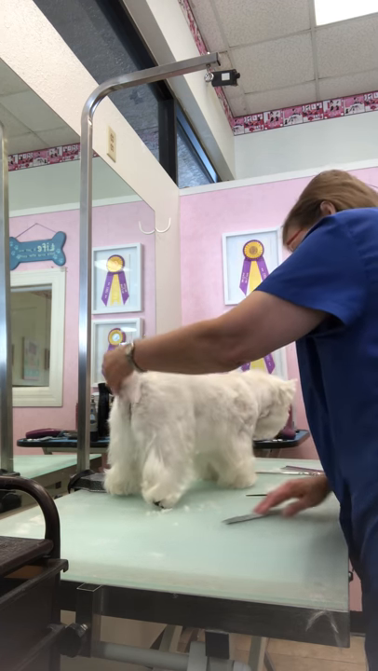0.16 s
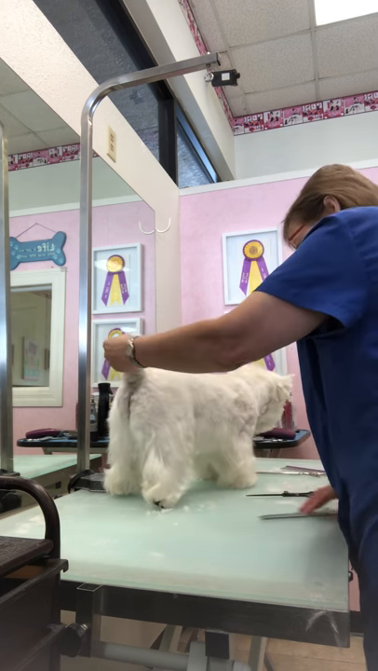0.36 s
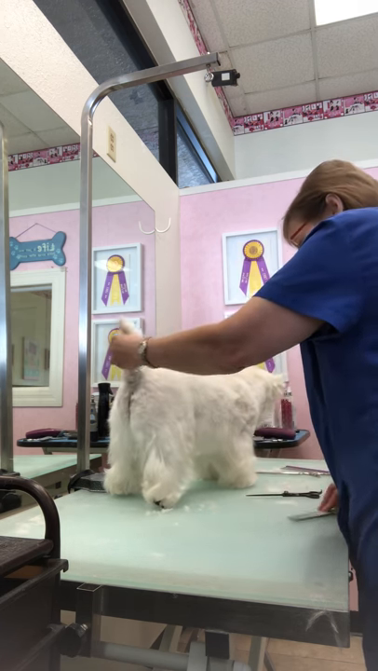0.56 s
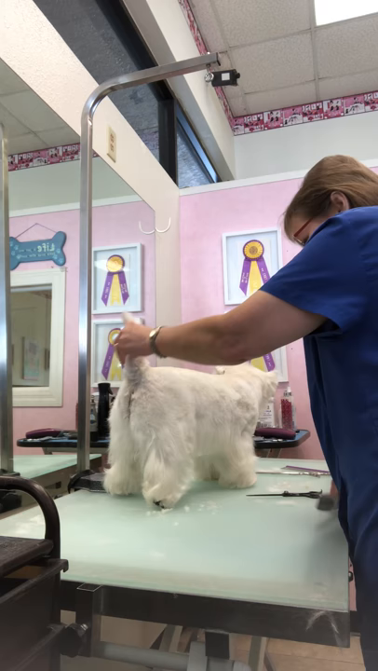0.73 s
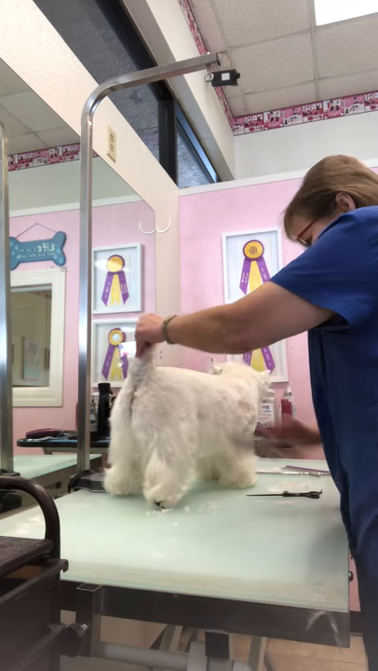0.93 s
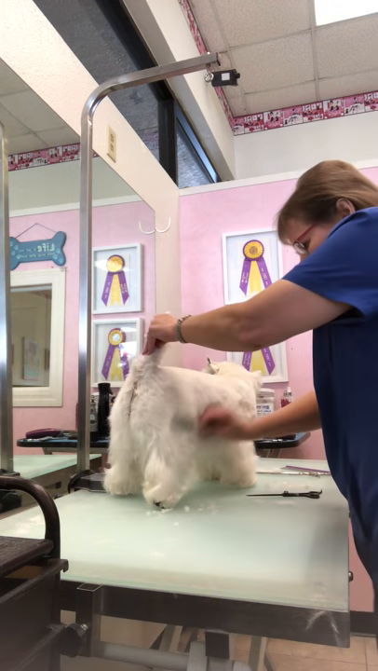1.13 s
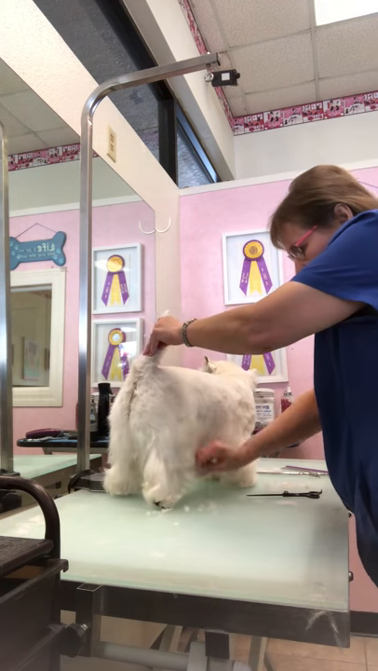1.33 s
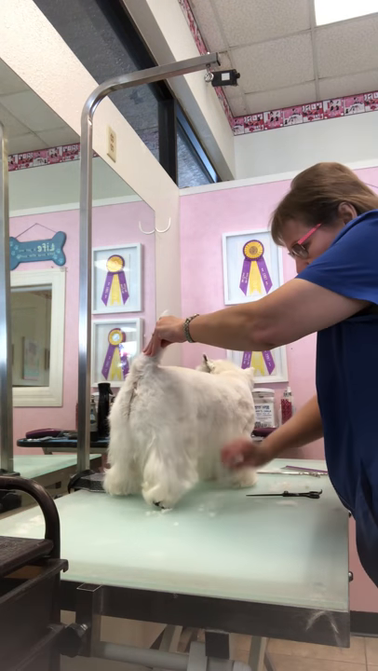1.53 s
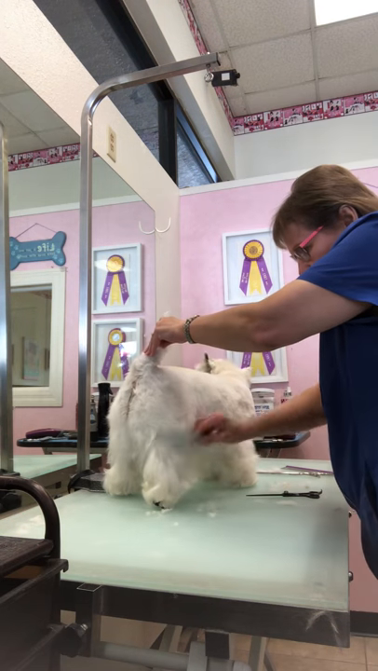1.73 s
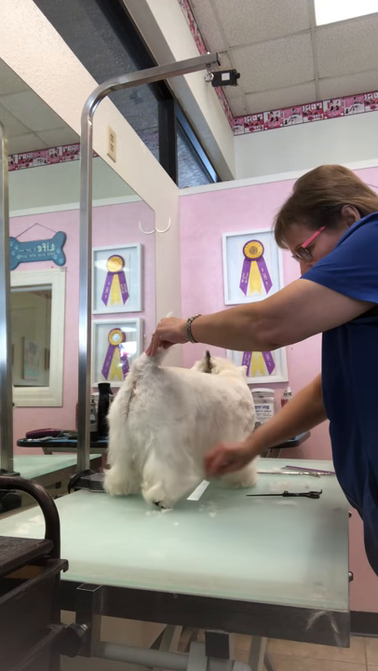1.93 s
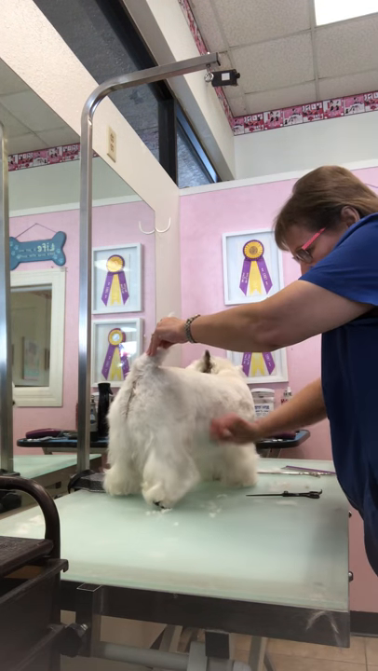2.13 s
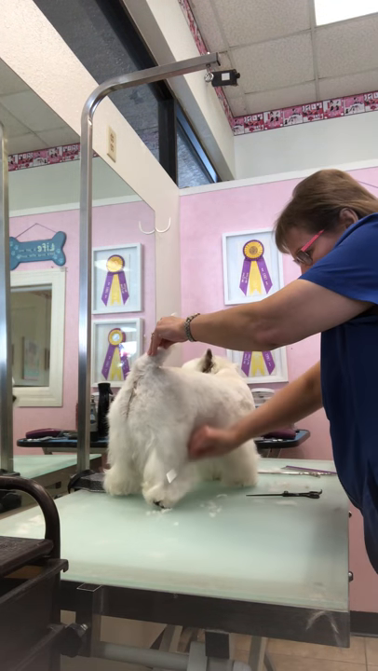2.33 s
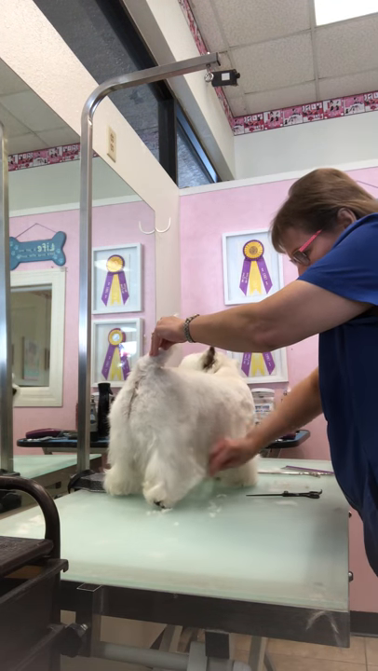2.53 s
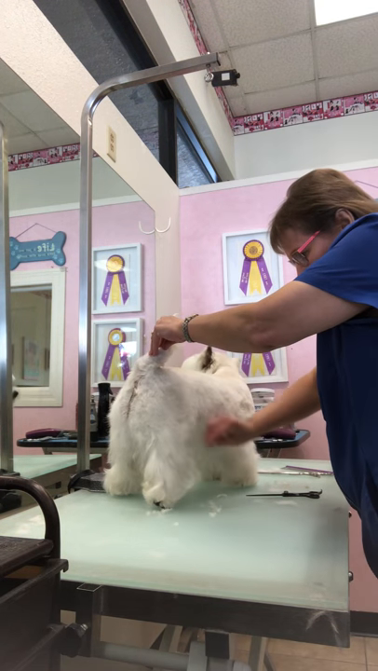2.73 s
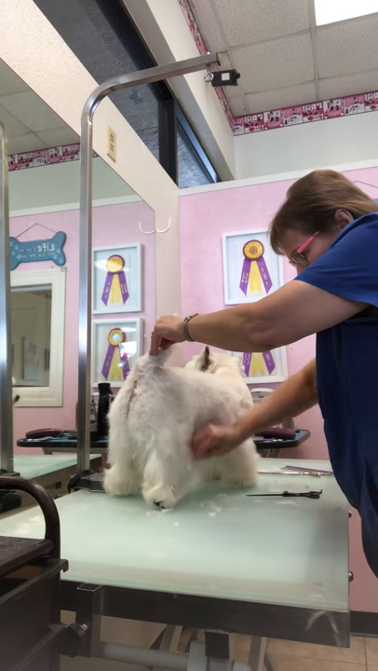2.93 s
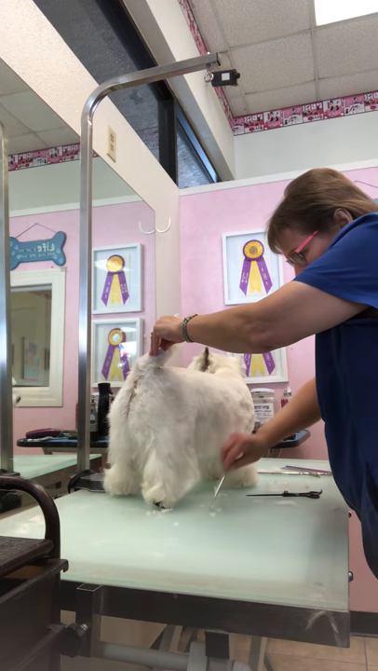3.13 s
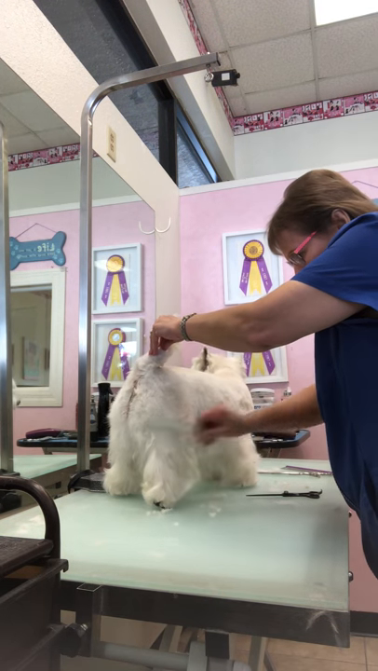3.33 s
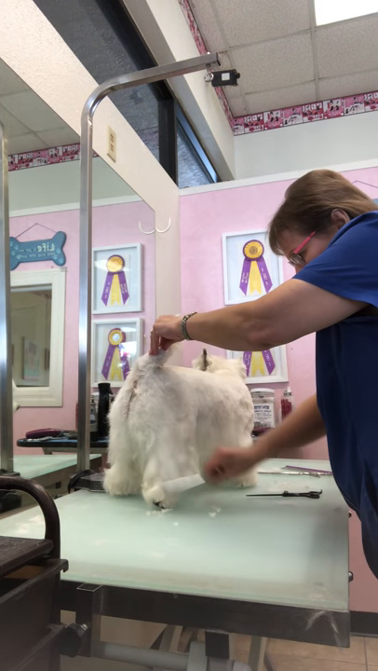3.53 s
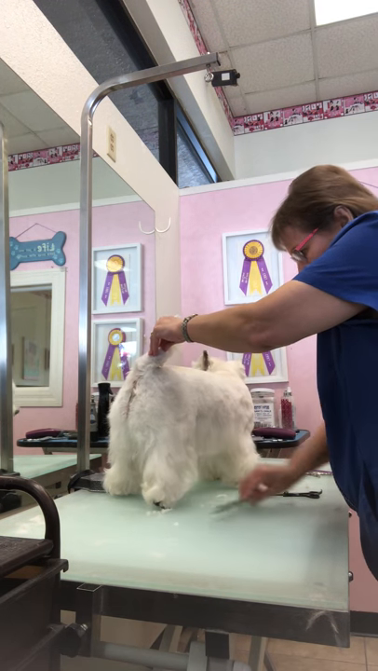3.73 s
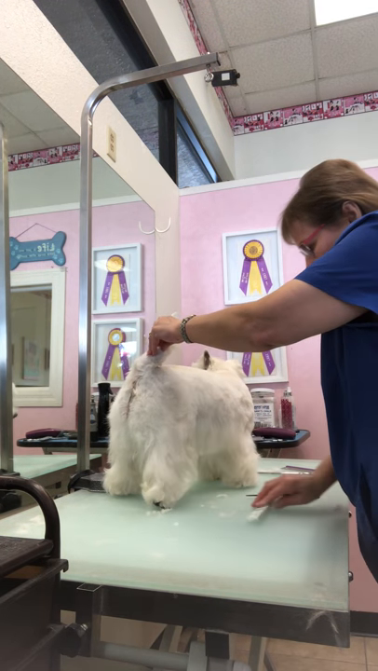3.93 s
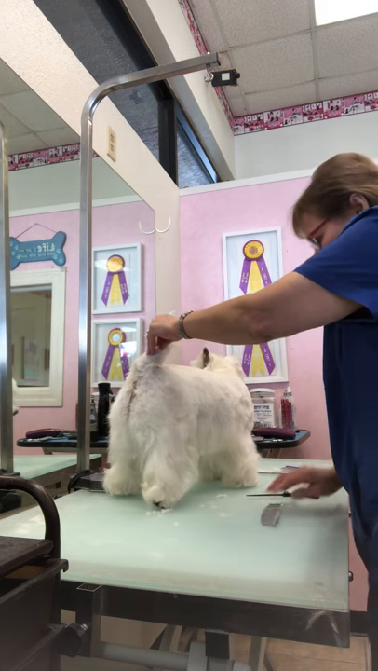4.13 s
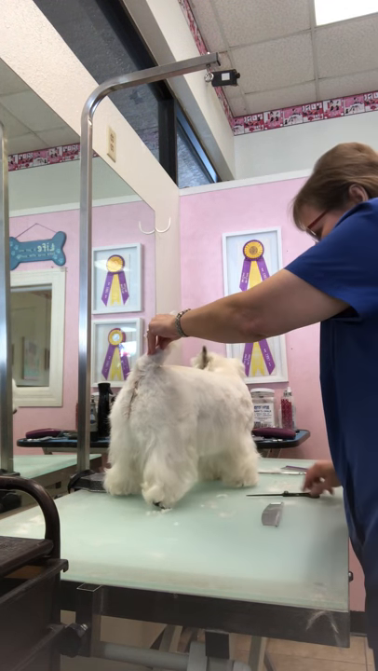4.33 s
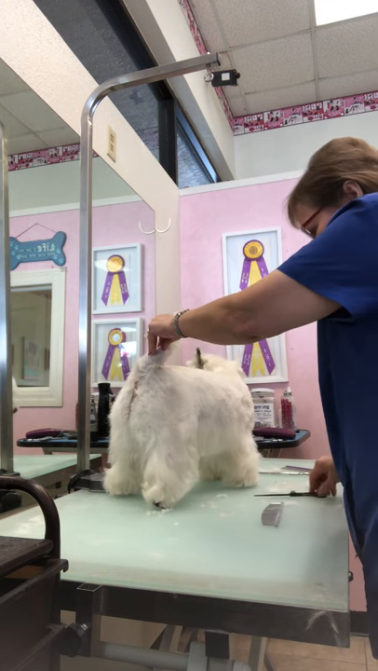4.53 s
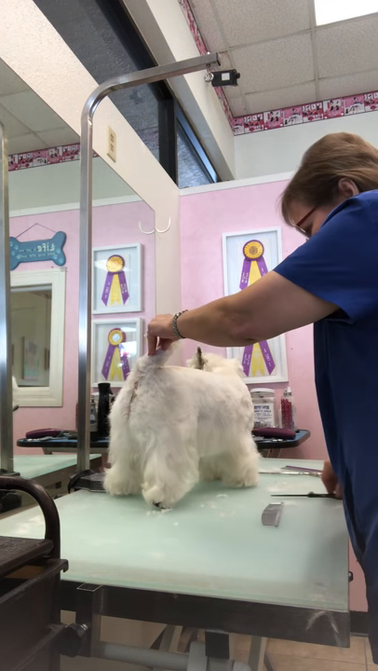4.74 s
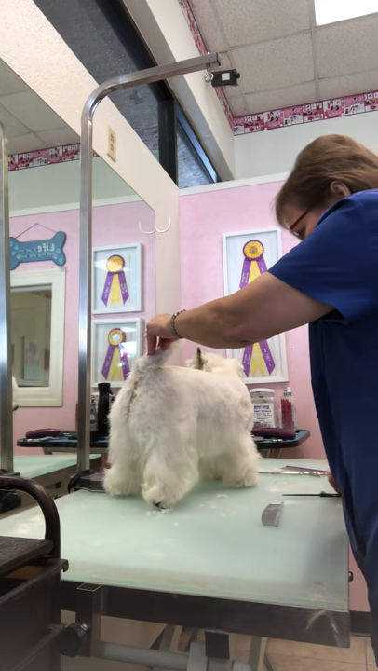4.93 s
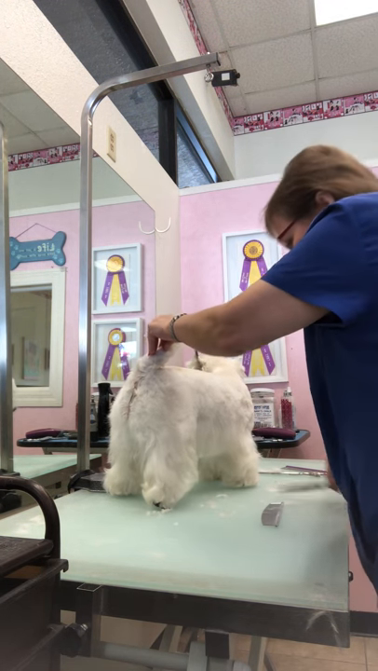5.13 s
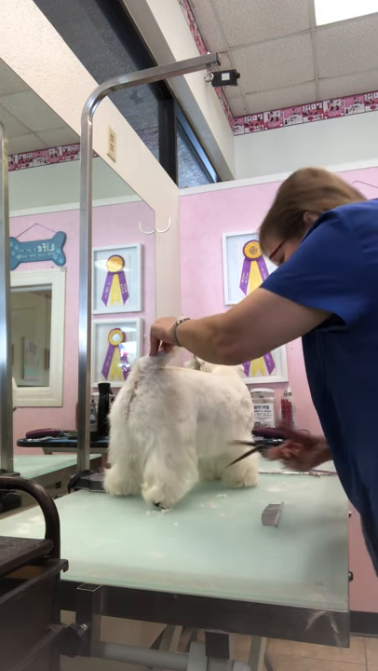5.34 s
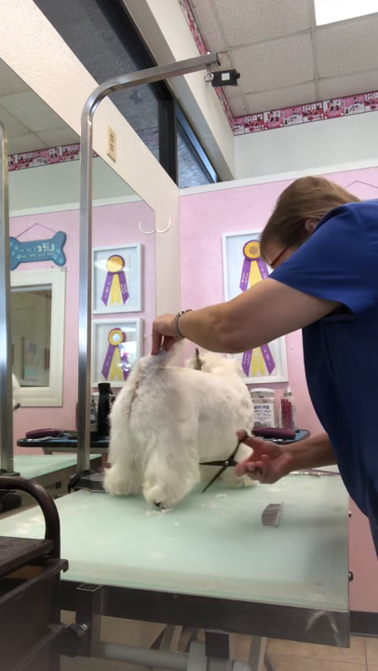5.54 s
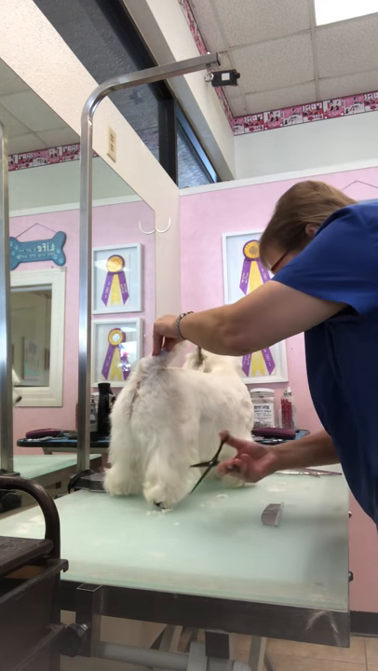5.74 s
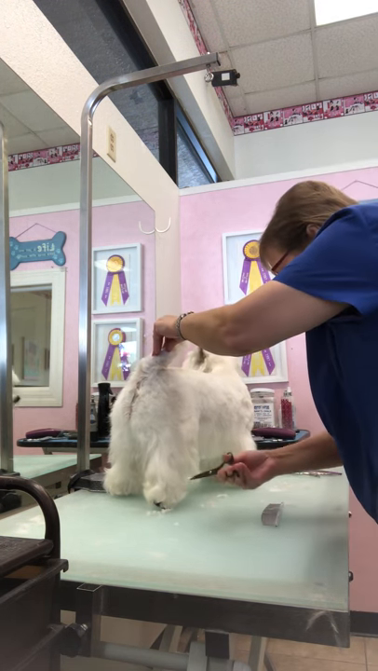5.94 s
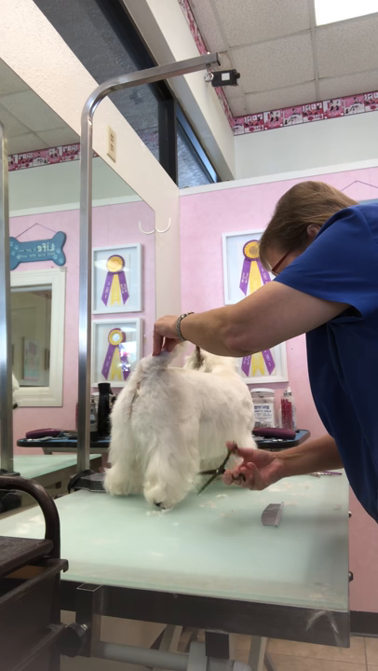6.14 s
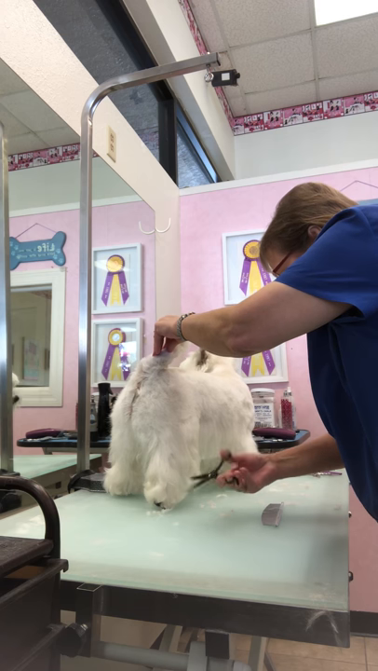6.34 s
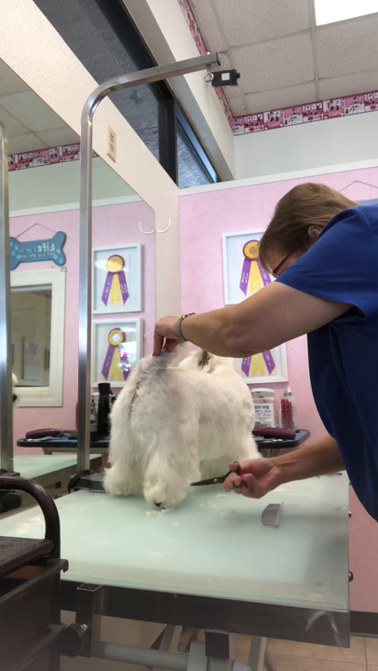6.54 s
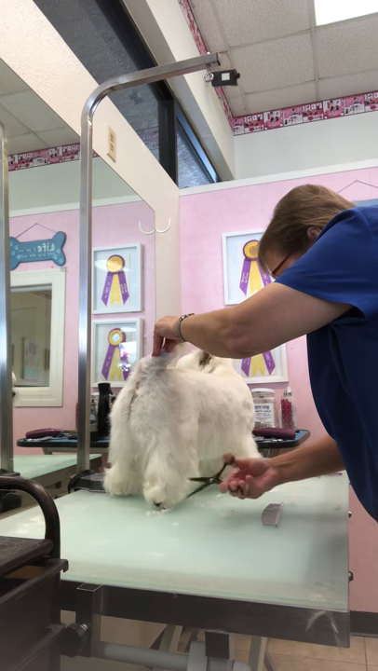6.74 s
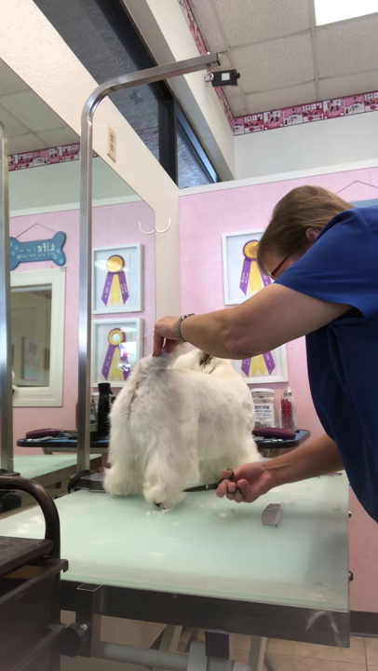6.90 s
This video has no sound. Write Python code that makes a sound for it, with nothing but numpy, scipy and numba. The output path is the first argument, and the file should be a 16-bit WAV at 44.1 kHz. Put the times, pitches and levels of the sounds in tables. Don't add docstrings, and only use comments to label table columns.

```python
import sys
import numpy as np
from scipy import signal
from scipy.fft import rfft, irfft, next_fast_len
from scipy.io import wavfile
from numba import njit

SR = 44100
rng = np.random.default_rng(int(sys.argv[2]) if len(sys.argv) > 2 else 0)


def generate_wav(sig):
    pcm = np.round(np.clip(np.atleast_2d(sig).T, -1, 1) * 32767).astype(np.int16)
    wavfile.write(sys.argv[1], SR, pcm)


def undo_db(level):
    steps = np.asarray(level, float) / 20
    return 10 ** steps


N = 311787

# (time [s], rise [s], fall [s], level [dB], loudest ring [Hz])
COMB_SLIDES = [
    (0.011, .03, .045, -58, 3000),
    (.09, 0.17, 0.51, -51.5, 2670),
    (.675, 0.041, 0.17, -60.5, 3330),
    (.764, 0.011, 0.062, -54, 3000),
    (3.655, 0.074, 0.24, -46.5, 2000),
]
# (frequency [Hz], density [dB per Hz])
COMB_HISS_SPECTRUM = [(290, -20), (500, 1), (933, -12), (1770, 0.5), (3200, -4.5), (3650, -5),
                      (5390, -17.5), (12100, -10.5), (16000, -15.5)]
# (frequency [Hz], width [Hz], level [dB])
COMB_MODES = [(2300, 180, -20), (3070, 130, 7), (5040, 73, 0.5), (7900, 130, -2), (11900, 150, -2),
              (14100, 150, -3)]
# (time [s], rise [s], body level [dB], relative hair hiss [dB], ringing teeth [Hz])
COAT_STROKES = [
    (1.494, 0.0021, -52, -4, 2600),
    (1.98, 0.045, -56.5, 11, 4200),
    (2.595, .05, -58, 6.5, 4200),
    (3.072, 0.075, -58, 8, 6100),
]
# (frequency [Hz], density [dB per Hz])
COAT_SPECTRUM = [(410, -28), (700, 4), (1600, -6), (2880, -4.5), (4720, -7), (6370, -1), (8700, -12),
                 (12000, -12.5), (14500, -5), (16000, -3)]
# (time [s], rise [s], fall [s], level [dB], loudest ring [Hz])
SHEARS_DRAGS = [
    (4.412, 0.038, 0.022, -46.5, 1520),
    (4.456, 0.0066, 0.18, -42, 1230),
    (4.668, 0.063, 0.29, -43, 1300),
    (4.91, 0.15, 0.18, -43, 1350),
    (5.108, .004, 0.2, -43.5, 2100),
]
# (frequency [Hz], density [dB per Hz])
DRAG_SPECTRUM = [(290, -33), (500, -4.5), (575, -51), (990, 18), (1290, -19), (1420, -7), (2350, 2.5),
                 (14000, -35)]
# (frequency [Hz], width [Hz], level [dB])
SHEARS_MODES = [(1098, 72, -3), (1460, 33, 11.5), (1688, 15, 14.5), (2025, 160, 6), (2540, 150, -7.5),
                (3220, 210, -37), (3900, 33, -10), (4470, 23, -10)]
# (shut time [s], shut level [dB], run-up level [dB], whisper [Hz], run-up top before shut [s])
BLADE_SNIPS = [
    (6.044, -51, -61, 12750, 0.035),
    (6.511, -50, -58.5, 14040, .027),
    (6.946, -52.5, -58, 14100, .024),
]
# (time [s], rise [s], fall [s], level [dB], whisper [Hz])
BLADE_OPENINGS = [
    (5.341, .006, .07, -52.5, 12200),
    (6.198, 0.01, 0.039, -59, 11300),
    (6.668, 0.0055, .05, -56.5, 11500),
]
# (frequency [Hz], density [dB per Hz])
EDGE_SPECTRUM = [(880, -19), (1500, 5), (2060, -36), (3060, 3), (3920, -31), (6060, 4), (8570, -9),
                 (9370, -15), (11500, -13), (12500, -4), (16000, 3)]
# (frequency [Hz], width [Hz], level [dB])
BLADE_MODES = [(3180, 350, -7), (5400, 480, 6), (10600, 250, 4), (12300, 370, 7), (13700, 400, -5)]
# (time [s], length [s], level [dB], pitch [Hz])
SINGING_EDGES = [(0.024, 0.061, -62.5, 3650), (0.091, 0.5, -58, 3600), (0.53, 0.16, -66, 3080),
                 (.2, 0.31, -60.5, 2200), (.2, .25, -68, 5150), (.22, 0.28, -61.5, 12400),
                 (0.41, 0.091, -64, 10500), (.67, 0.087, -58, 3200), (0.65, 0.15, -64, 10200),
                 (.76, 0.027, -59, 7230), (0.4, 0.067, -57, 784), (1.497, 0.14, -62.5, 2610),
                 (1.497, 0.09, -80, 5400), (2.005, 0.045, -53.5, 2700), (1.994, 0.12, -65, 4220),
                 (3.659, 0.024, -43.5, 770), (3.72, 0.079, -52.5, 7130), (3.753, 0.047, -46, 1870),
                 (3.803, 0.12, -53.5, 3670), (3.862, 0.14, -65.5, 4270), (5.1, 0.035, -65, 7700)]
# (time [s], length [s], level [dB], centre [Hz])
BROAD_RUSTLES = [(1.87, 0.039, -65, 1430), (2.13, .07, -66, 1400), (2.41, 0.07, -65.5, 1530),
                 (2.97, .09, -62.5, 1440), (3.0, 0.044, -72, 3000), (3.114, 0.078, -72, 6700),
                 (2.0, 0.055, -58, 13200), (.01, 0.055, -59, 950), (.1, .12, -57, 1240),
                 (4.915, .1, -61, 4600), (4.69, .06, -63, 4000), (6.005, .03, -68, 3100),
                 (6.48, .015, -65, 2600), (6.925, .03, -66, 2900), (4.025, .024, -60, 2300),
                 (4.449, 0.011, -69, 6000), (4.785, 0.024, -61, 5000), (5.42, 0.24, -72.5, 2800),
                 (5.45, 0.22, -70, 1540), (5.42, 0.23, -73, 5000), (5.345, 0.033, -61.5, 6600),
                 (6.2, 0.04, -72, 5550), (6.67, 0.026, -70, 5300)]
# (time [s], peak level [dB], clack pitch [Hz], thud level [dB], tick level [dB])
TABLE_BLOWS = [(0.7662, -44.5, 3500, -74, -72), (1.495, -36, 2730, -37, -59),
               (1.9853, -44, 1850, -42.5, -57), (2.6013, -45.5, 1550, -53.5, -58),
               (3.078, -43.5, 1590, -46, -67), (3.6521, -34.5, 1010, -33.5, -39),
               (4.0461, -9, 1880, -35, -33.5), (4.4603, -56, 980, -71, -77), (4.6749, -48, 1450, -57, -84),
               (4.7517, -54, 1870, -54, -77), (4.7891, -58, 1330, -48.5, -73),
               (5.0372, -35, 1460, -60, -62), (5.1108, -30, 2000, -47, -49.5)]
# (frequency [Hz], level [dB], decay T60 [s])
TABLE_MODES = [(135, 1.5, .12), (190, -1.5, 0.046), (248.4, -6.5, 0.35), (312.4, -1.5, 0.063),
               (360, -4.5, 0.041), (450, -1.5, 0.18), (514.4, -8, 0.048), (690, -2.5, 0.12)]
# (time [s], peak level [dB], pitch [Hz], decay T60 [s])
SOFT_BUMPS = [(1.502, -44.5, 287, 0.34), (1.55, -47, 423, 0.13), (3.084, -47, 260, 0.18),
              (3.66, -42.5, 510, 0.22), (2.17, -56.5, 800, 0.086), (3.408, -59.5, 687, 0.13),
              (3.422, -40.5, 163, 0.35), (3.518, -45, 273, 0.14), (4.05, -37, 489, 0.26),
              (5.129, -45, 450, 0.16), (6.299, -61.5, 1380, 0.093), (6.519, -59, 1440, 0.11)]
# (time [s], peak level [dB], pitch [Hz])
TIP_TICKS = [
    (5.343, -41, 12540),
    (6.0433, -48, 10600),
    (6.2013, -49, 10430),
    (6.51, -37, 13700),
    (6.671, -45, 11180),
    (6.8194, -72, 11230),
    (6.944, -39, 14400),
]
# (frequency [Hz], T60 [s])
ROOM_DECAY = [(200, 0.88), (1000, 0.9), (2000, 0.45), (5000, 0.54), (10000, 0.36), (16000, 0.26)]
# (slip [Hz], level [dB], time in step [s])
NEIGHBOUR_MOTORS = [(-.44, -56.5, 3.4), (.72, -67, 2.94)]
# (multiple [1], level [dB])
MOTOR_OVERTONES = [(2, -57), (3, -60.5), (4, -66), (5, -66.5)]
# (frequency [Hz], density [dB per Hz])
AIR_SPECTRUM = [(18, -30), (30, -16), (59, -5.5), (131, -1), (194, -8.5), (287, -7), (364, -9.5),
                (486, -11.5), (801, -22.5), (1720, -32), (2480, -33), (7470, -41), (8740, -46),
                (14800, -46.5), (16000, -54)]
# (time [s], level [dB])
DUCT_GUSTS = [
    (0.0, 5.8),
    (3.55, 1.8),
]

SLIDE_RULE = dict(start_db=-11.5, end_db=-17.5, bright_db=0, follow=0.29, start_ratio=0.95, end_ratio=1.6)
STROKE_RULE = dict(start_db=-5.5, end_db=-22.5, follow=0.58, start_ratio=1, end_ratio=0.23)
DRAG_RULE = dict(start_db=-10, end_db=-33.5, bright_db=-17.5, follow=-0.62, start_ratio=1.22, end_ratio=0.91)
OPENING_RULE = dict(start_db=-1, end_db=-30, bright_db=-10, follow=-0.31, start_ratio=1, end_ratio=1.2)


def comb_slides():
    pushes = [push(*row, **SLIDE_RULE) for row in COMB_SLIDES]
    return friction(pushes, COMB_HISS_SPECTRUM, COMB_MODES, 4100, per_s=9000, spread_db=-1, modes_db=-7,
                    flicker_db=0.5, glide_db=-15, glide_width_hz=500, teeth_db=1)


def coat_strokes():
    pushes = [push(s, rise, 0.1, db, hz, bright_db=hiss_db, **STROKE_RULE)
              for s, rise, db, hiss_db, hz in COAT_STROKES]
    return friction(pushes, COAT_SPECTRUM, [], 3850, per_s=9800, spread_db=1, modes_db=-5,
                    flicker_db=1.5, glide_db=-9, glide_width_hz=1600, teeth_db=0)


def shears_drags():
    pushes = [push(*row, **DRAG_RULE) for row in SHEARS_DRAGS]
    return friction(pushes, DRAG_SPECTRUM, SHEARS_MODES, 3050, per_s=4000, spread_db=0.5, modes_db=3.5,
                    flicker_db=-1.5, glide_db=5.5, glide_width_hz=320, teeth_db=-14.5)


def blade_strokes():
    moves = [snip(*row) for row in BLADE_SNIPS] + [push(*row, **OPENING_RULE) for row in BLADE_OPENINGS]
    return friction(moves, EDGE_SPECTRUM, BLADE_MODES, 9900, per_s=7000, spread_db=2.5, modes_db=-8,
                    flicker_db=-1.5, glide_db=-4, glide_width_hz=1400, teeth_db=-8.5, bright_first=True)


def push(s, rise, fall, db, hz, start_db, end_db, bright_db, follow, start_ratio, end_ratio):
    return [(s, db + start_db, bright_db + follow * start_db, hz * start_ratio),
            (s + rise, db, bright_db, hz),
            (s + rise + fall, db + end_db, bright_db + follow * end_db, hz * end_ratio)]


def snip(s, db, run_db, whisper_hz, lead):
    start_hz, open_hz = whisper_hz * 0.78, whisper_hz * 0.85
    ring_hz, shut_hz = 3000, 3000 * 1.33
    hair_start_db, hair_run_db, hair_shut_db, hair_after_db = -12, 1, -6.5, 2
    return [(s - lead - 0.035, run_db - 25, hair_start_db, start_hz, ring_hz),
            (s - lead, run_db, hair_start_db, open_hz, ring_hz),
            (s - lead * 0.7, run_db - 2.5, hair_run_db, whisper_hz, ring_hz),
            (s - 0.011, run_db - 14, hair_run_db, whisper_hz, ring_hz),
            (s, db, hair_shut_db, whisper_hz, shut_hz),
            (s + 0.019, db - 28, hair_after_db, whisper_hz, shut_hz),
            (s + 0.06, db - 38, hair_after_db, whisper_hz, ring_hz)]


def friction(strokes, spectrum, modes, split_hz, per_s, spread_db, modes_db, flicker_db, glide_db,
             glide_width_hz, teeth_db, bright_first=False):
    out = np.zeros(N)
    for rows in strokes:
        start, end = rows[0][0], rows[-1][0]
        size = SR // 4 * (1 + int((end - start + 0.06) * 4))
        t = start + np.arange(size) / SR
        first_db, second_db, *glides = in_time(rows, t)
        jerks = slips(size, per_s, spread_db, flicker_db)
        sound = coloured(jerks, spectrum)
        for hz in glides:
            turn = 2 * np.pi * np.clip(hz, 100, 0.45 * SR) / SR
            glide = gliding(jerks, turn, np.exp(-np.pi * glide_width_hz / SR))
            sound = sound + undo_db(glide_db) * rms_one(glide)
        caught = [(hz, width, db + at_hz(spectrum, hz) + teeth_db) for hz, width, db in teeth()]
        rung = np.zeros(size)
        for hz, width, db in modes + caught:
            swell = undo_db(db + 4.2 * drift(3.2, size))
            rung += swell * rms_one(ring(jerks, hz, 1.8 / width)) * np.sqrt(width)
        sound = sound + undo_db(modes_db) * rms_one(rung)
        dull = signal.sosfilt(signal.butter(4, split_hz, fs=SR, output="sos"), sound)
        bright = signal.sosfilt(signal.butter(4, split_hz, "high", fs=SR, output="sos"), sound)
        first, second = (bright, dull) if bright_first else (dull, bright)
        stroke = undo_db(first_db) * (rms_one(first) + undo_db(second_db) * rms_one(second))
        fade_in = np.clip((t - start) / 0.00282, 0, 1)
        fade_out = np.clip((end - t) / (0.13 * (end - start)), 0, 1)
        add(out, start, stroke * fade_in * fade_out)
    return out


def slips(size, per_s, spread_db, flicker_db):
    sizes = undo_db(spread_db * np.minimum(rng.exponential(1, size), 5)) * rng.choice([-1, 1], size)
    return sizes * (rng.random(size) < per_s / SR) * undo_db(flicker_db * drift(40, size))


def teeth():
    pitches = np.linspace(1300, 15000, 18) * rng.uniform(0.875, 1.05, 18)
    return [(hz, 170, db) for hz, db in zip(pitches, rng.normal(0, 2, 18))]


@njit
def gliding(x, turn, r):
    y = np.zeros(len(x))
    for i in range(2, len(x)):
        y[i] = np.sin(turn[i]) * x[i] + 2 * r * np.cos(turn[i]) * y[i - 1] - r * r * y[i - 2]
    return y


def singing(rows, width_hz, width_share):
    out, t = np.zeros(N), np.arange(SR // 2) / SR
    for s, length, db, hz in rows:
        half = (width_hz + width_share * hz) / 2
        tone = band(slips(len(t), 6000, 5.1, 2), max(hz - half, 50), hz + half)
        swell = np.sqrt(np.sin(np.pi * np.clip(t / length, 0, 1)) + 1e-12)
        add(out, s, undo_db(db) * rms_one(tone) * swell)
    return out


def blows():
    out, t = np.zeros(N + SR), np.arange(SR // 3) / SR
    soft_push = np.exp(-((t - 0.005) / 0.00054) ** 2) / 30
    for s, peak_db, hz, thud_db, tick_db in TABLE_BLOWS:
        rattle, crack = rng.standard_normal((2, len(t)))
        clack = np.cos(2 * np.pi * hz * (t - 0.0013)) * np.exp(-((t - 0.0013) / 0.00055) ** 2)
        decay = np.exp(-t / 0.01) + undo_db(-15.5) * np.exp(-t / 0.066)
        onset = np.clip((t - 0.001) / 0.00075, 0, 1)
        clack += undo_db(-14) * rms_one(band(rattle, 550, 3560)) * decay * onset
        tick_hz = 5540
        crack = rms_one(band(crack, 3240, 16000)) + undo_db(-2.5) * rms_one(band(crack, tick_hz / 1.2, tick_hz * 1.2))
        tick = crack * (np.exp(-t / 0.0022) + undo_db(-3) * np.exp(-t / 0.031))
        strengths = rng.normal(0, 1.7, len(TABLE_MODES))
        modes = sum(undo_db(db + g) * ring(soft_push, f, t60) for (f, db, t60), g in zip(TABLE_MODES, strengths))
        thud = band(modes, 160, 2000)
        thud += undo_db(-3.5) * rms_one(band(rattle, 150, 900)) * np.exp(-t / 0.018) * np.clip(t / 0.027, 0, 1)
        add(out, s, undo_db(peak_db + 4) * clack + undo_db(tick_db - 1.5) * tick + undo_db(thud_db) * thud)
    return out[:N]


def bumps():
    out, t = np.zeros(N + SR), np.arange(SR // 3) / SR
    for s, peak_db, hz, t60 in SOFT_BUMPS:
        noise = rng.standard_normal(len(t))
        swell = np.minimum(t / 0.0055, 1) * undo_db(-60 * t / t60)
        add(out, s, undo_db(peak_db) * swell * rms_one(band(noise, hz / 1.1, hz * 1.1)))
    return out[:N]


def ticks():
    out, t = np.zeros(N + SR), np.arange(SR // 20) / SR
    for s, peak_db, hz in TIP_TICKS:
        tone = np.sin(2 * np.pi * hz * t) * np.exp(-t / 0.0013)
        crack = band(rng.standard_normal(len(t)), 3800, 20000) * np.exp(-t / 0.004)
        add(out, s, undo_db(peak_db) * (tone + undo_db(-11) * crack))
    return out[:N]


def room(x):
    t, edges = np.arange(SR) / SR, 80 * 2 ** np.arange(0, 8, 0.5)
    white = rng.standard_normal((2, SR))
    tail = np.zeros(SR)
    for k, (low, high) in enumerate(zip(edges, edges[1:])):
        tail += band(white[k % 2], low, high) * undo_db(-60 * t / at_hz(ROOM_DECAY, low * 1.4))
    tail *= np.clip((t - 0.003) / 0.002, 0, 1)
    return signal.fftconvolve(x, tail / np.sqrt(np.sum(tail ** 2)))[:N]


def hum():
    t = np.arange(N) / SR
    turn = 2 * np.pi * 58 * t
    main = undo_db(-51.5) * np.sin(turn)
    others = sum(undo_db(db) * np.sin(turn + 2 * np.pi * slip * (t - s)) for slip, db, s in NEIGHBOUR_MOTORS)
    upper = sum(undo_db(db + 3.4 * drift(0.88, N)) * np.sin(round(k) * turn + 1.1 * drift(0.8, N))
                for k, db in MOTOR_OVERTONES)
    return np.sqrt(2) * (main + others + upper)


def air():
    t = np.arange(N) / SR
    noise = undo_db(-53.5) * coloured(rng.standard_normal(N), AIR_SPECTRUM)
    swell = sum(db * np.exp(-((t - s) / 0.2) ** 2) for s, db in DUCT_GUSTS)
    return noise + band(noise, 130, 900) * (undo_db(swell + drift(7.2, N)) - 1)


def rms_one(x):
    return x / np.sqrt(np.mean(x ** 2) + 1e-20)


def at_hz(points, hz):
    freqs, values = np.array(points)[:, 0], np.array(points)[:, 1]
    return np.interp(np.log(hz + 1), np.log(freqs), values)


def in_time(rows, t):
    s, *columns = np.transpose(rows)
    return [np.interp(t, s, c) for c in columns]


def coloured(x, spectrum):
    size = next_fast_len(len(x))
    gain = undo_db(at_hz(spectrum, np.fft.rfftfreq(size, 1 / SR)))
    return rms_one(irfft(rfft(x, size) * gain, size)[:len(x)])


def band(x, low_hz, high_hz):
    return signal.sosfilt(signal.butter(2, [low_hz, min(high_hz, 0.45 * SR)], "band", fs=SR, output="sos"), x)


def drift(rate, size):
    steps = rng.standard_normal(size * 400 // SR + 402)
    r = np.exp(-2 * np.pi * rate / 400)
    slow = signal.lfilter([np.sqrt(1 - r * r)], [1, -r], steps)[400:]
    return np.interp(np.arange(size) * 400 / SR, np.arange(len(slow)), slow)


def ring(x, hz, t60):
    r, w = undo_db(-60 / (t60 * SR)), 2 * np.pi * min(hz, 0.45 * SR) / SR
    return signal.lfilter([0, np.sin(w)], [1, -2 * r * np.cos(w), r * r], x + 1e-18)


def add(out, s, sound):
    i = round(s * SR)
    out[i:i + len(sound)] += sound[:len(out) - i]


def scene():
    rubbing = comb_slides() + coat_strokes() + shears_drags() + blade_strokes()
    rubbing += singing(SINGING_EDGES, 150.3, 0.028) + singing(BROAD_RUSTLES, 665, 0.26)
    struck = blows() + bumps()
    tips = ticks()
    tail = room(undo_db(-27) * tips + undo_db(-10.5) * rubbing + undo_db(-10.5) * struck)
    return (rubbing + tips + struck + tail + hum() + air())[None]


def band_limit(x):
    return signal.sosfilt(signal.butter(12, 16500, fs=SR, output="sos"), x)


def record(dry):
    cut = signal.sosfilt(signal.ellip(10, 0.5, 60, 15850, fs=SR, output="sos"), dry)
    cut = signal.sosfilt(signal.butter(3, 42, "high", fs=SR, output="sos"), cut)
    return band_limit(cut)


dry = scene()
out = record(dry)
generate_wav(out)
```